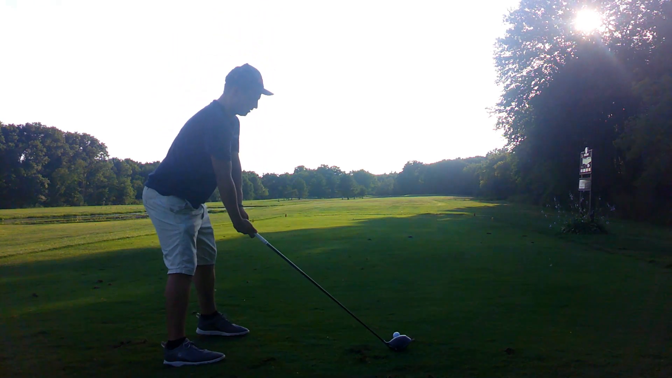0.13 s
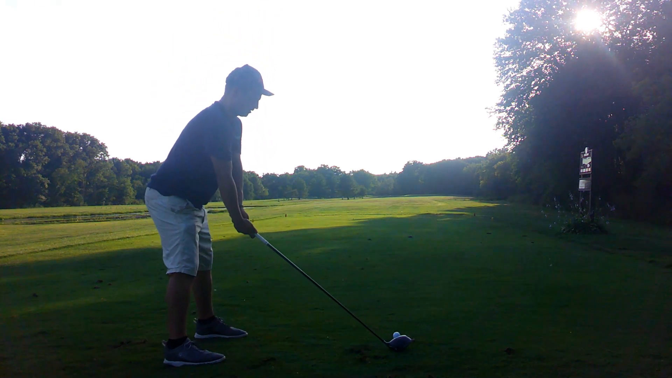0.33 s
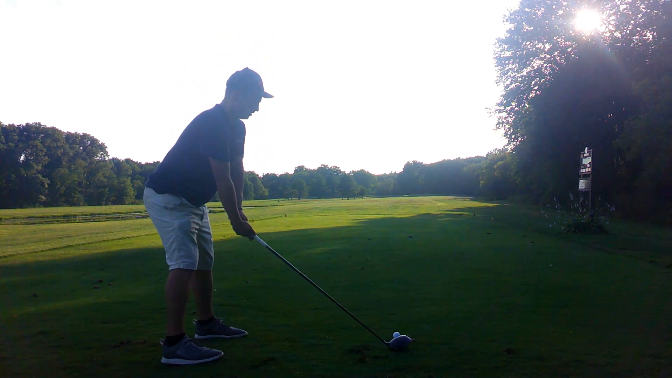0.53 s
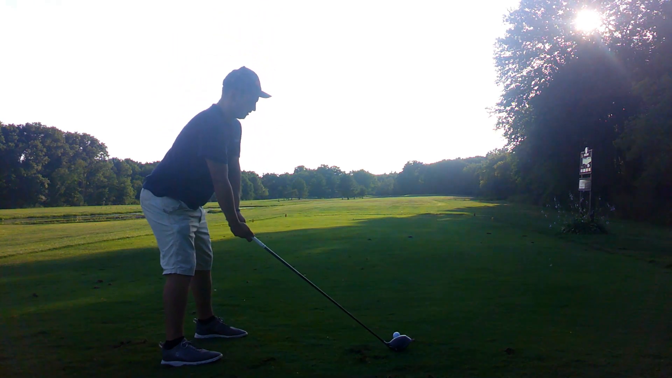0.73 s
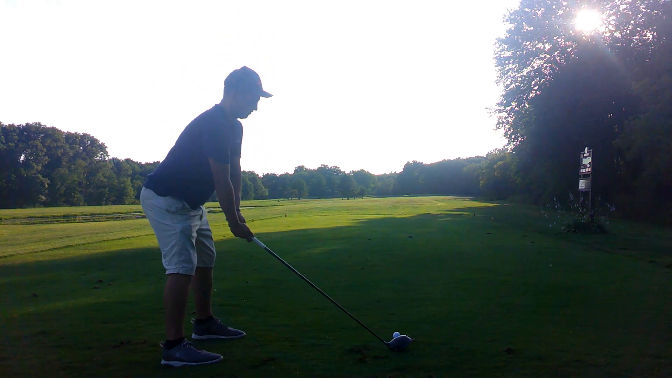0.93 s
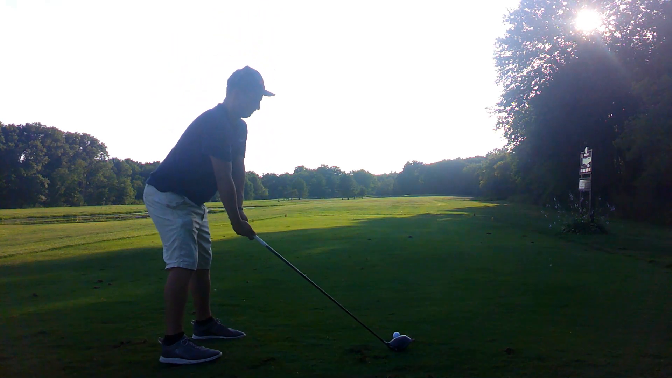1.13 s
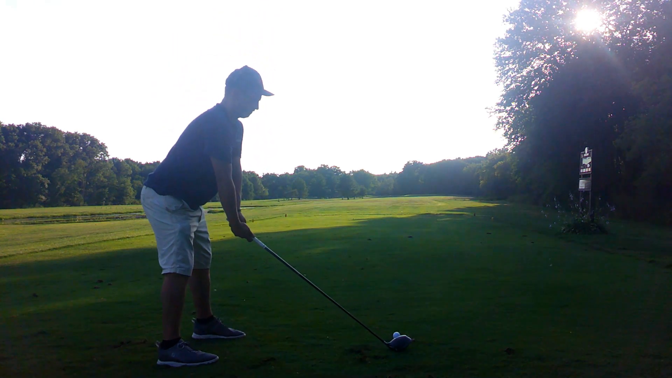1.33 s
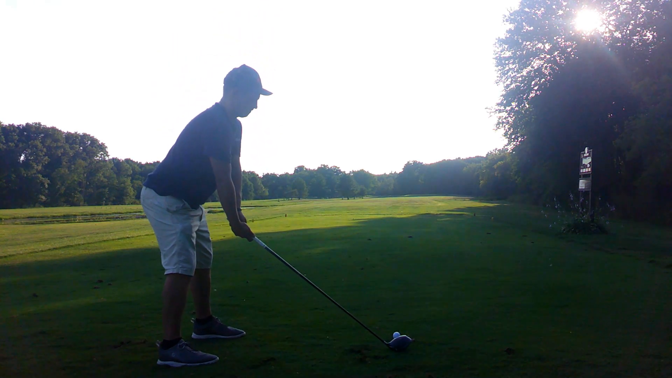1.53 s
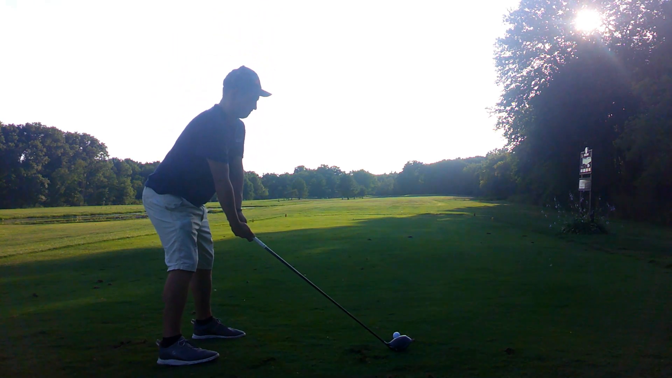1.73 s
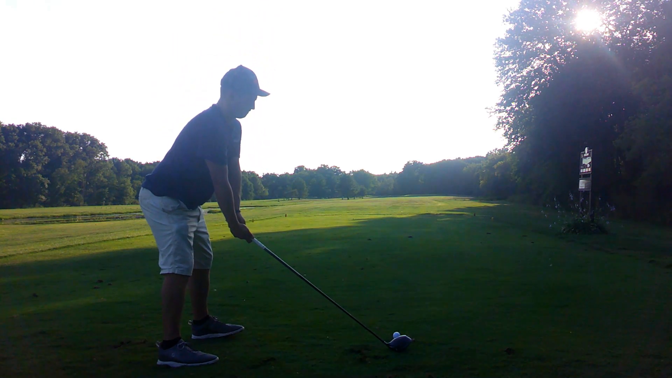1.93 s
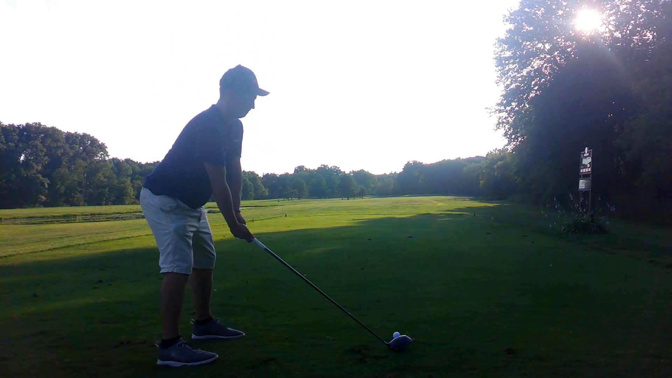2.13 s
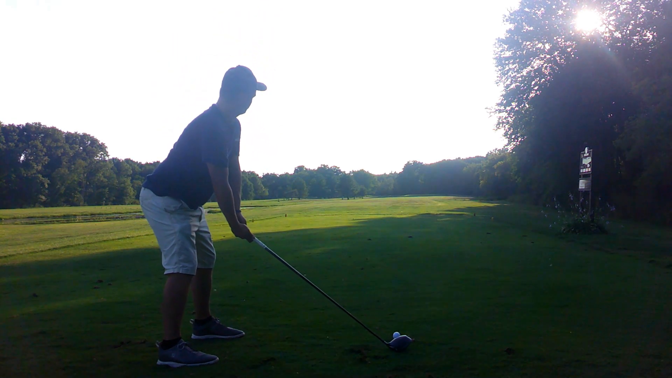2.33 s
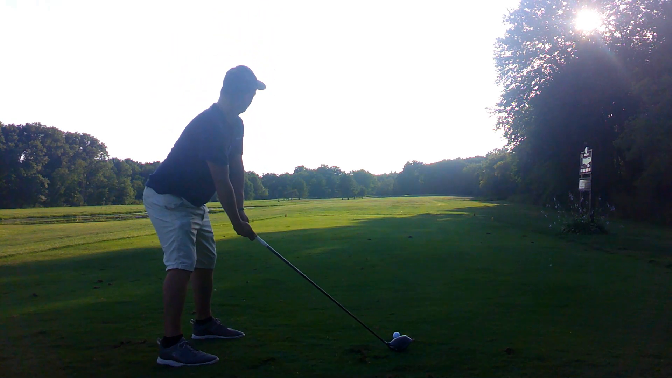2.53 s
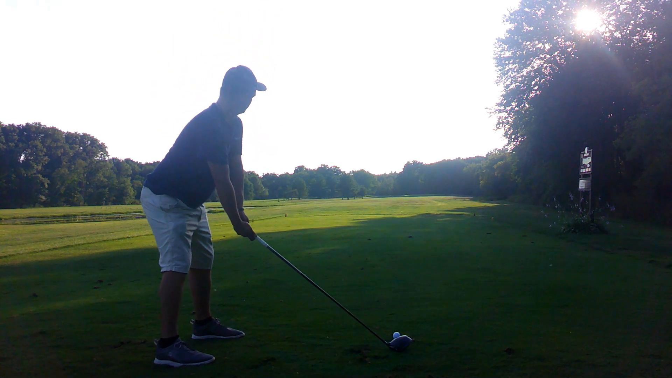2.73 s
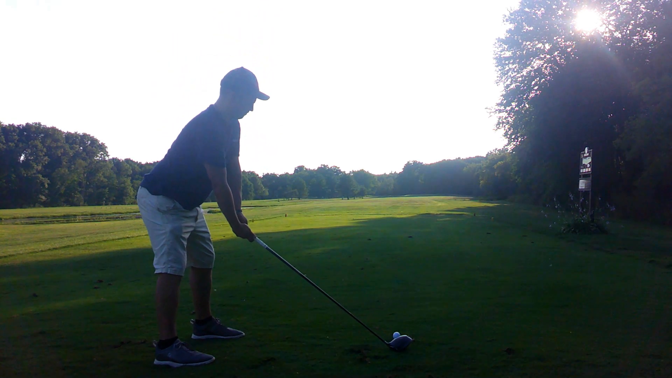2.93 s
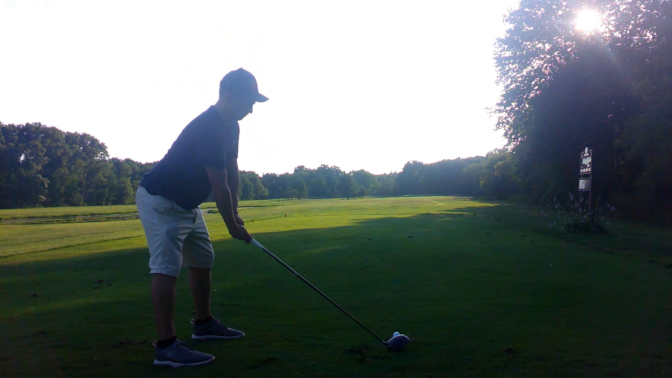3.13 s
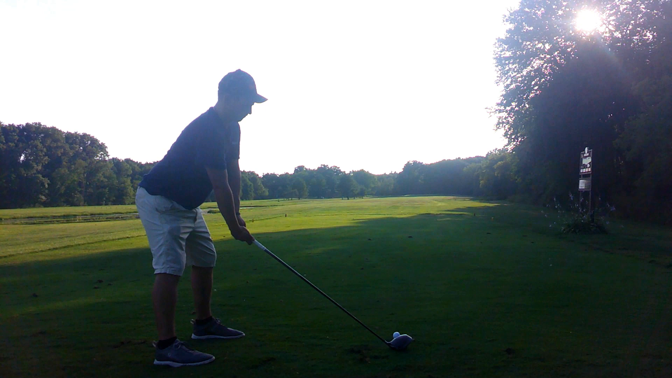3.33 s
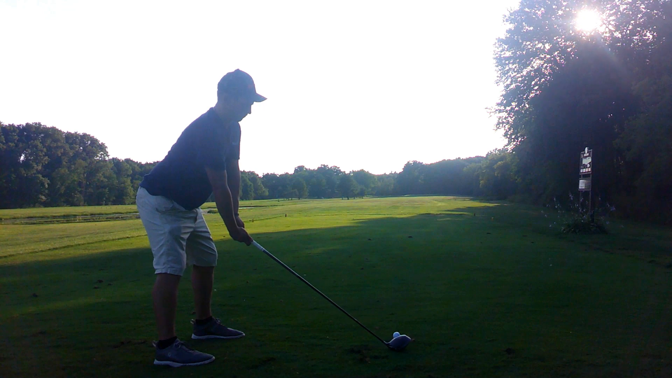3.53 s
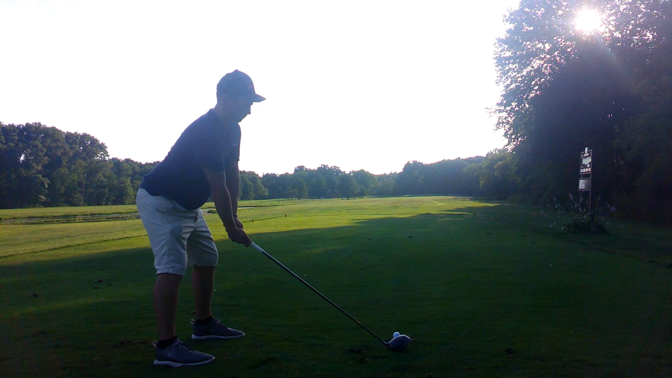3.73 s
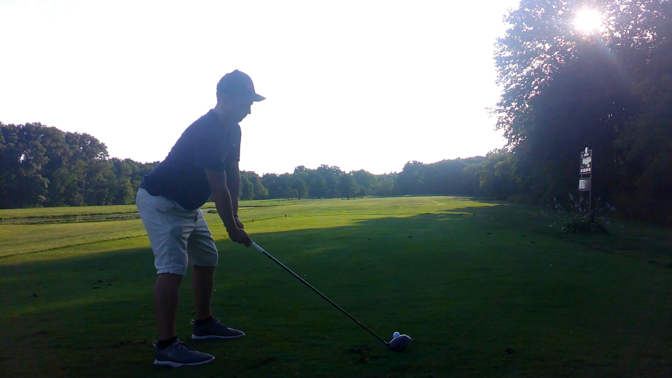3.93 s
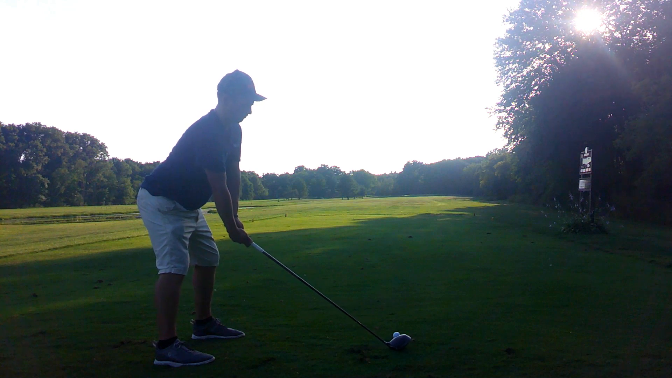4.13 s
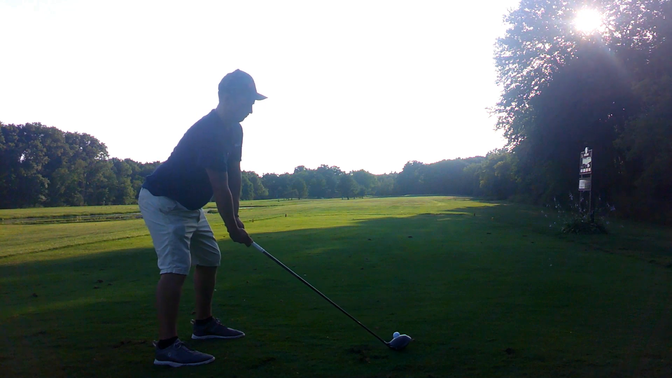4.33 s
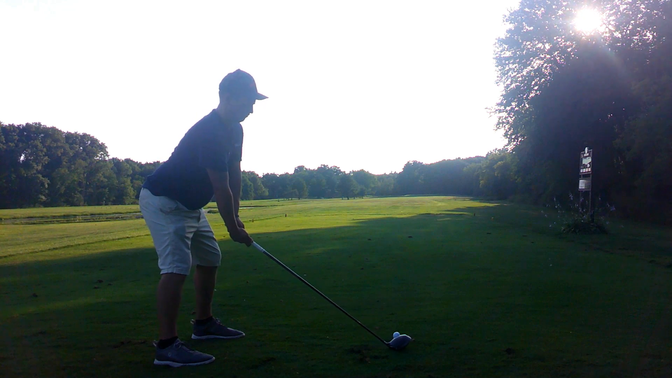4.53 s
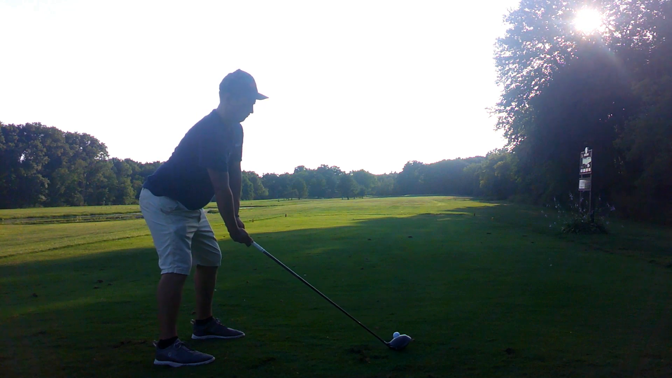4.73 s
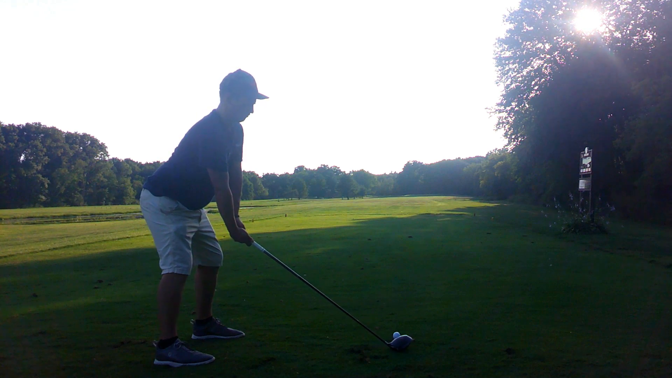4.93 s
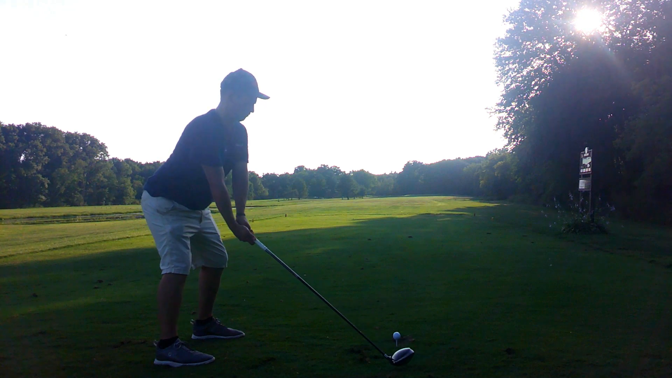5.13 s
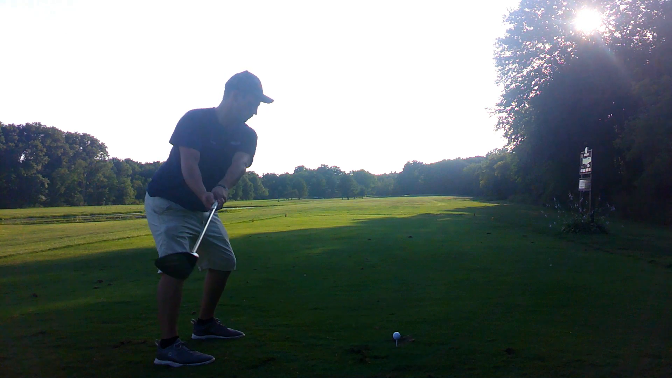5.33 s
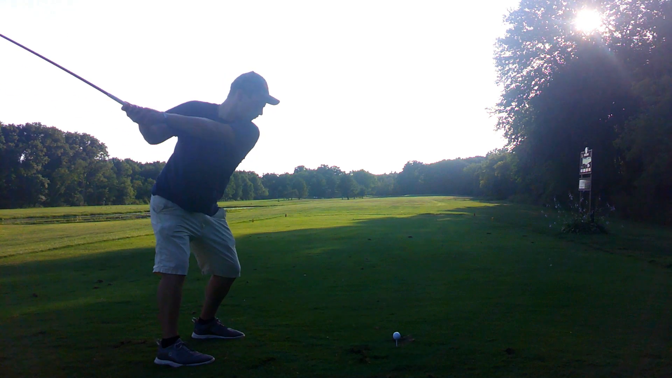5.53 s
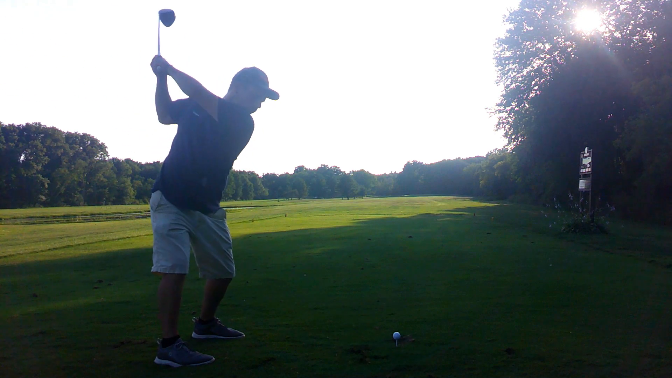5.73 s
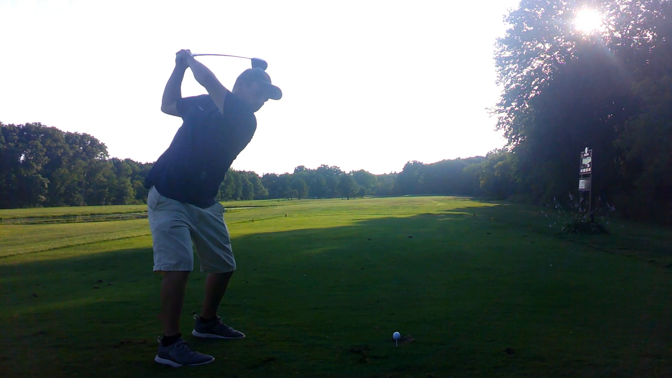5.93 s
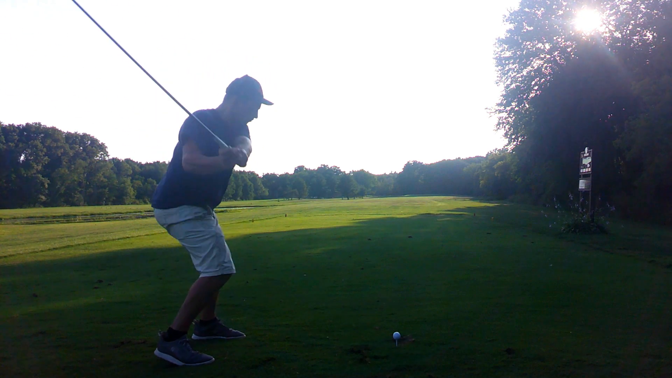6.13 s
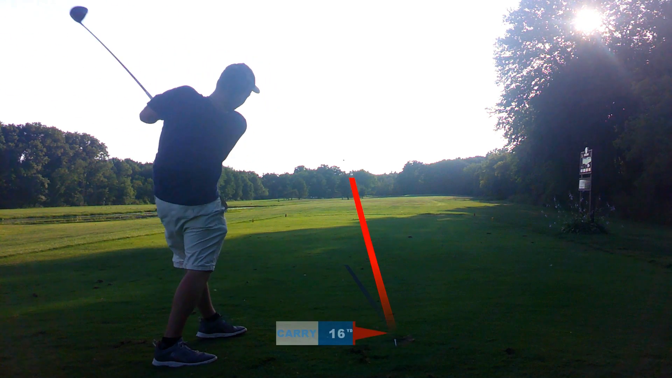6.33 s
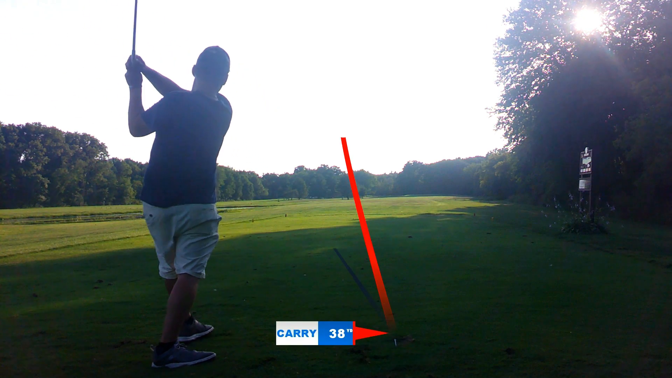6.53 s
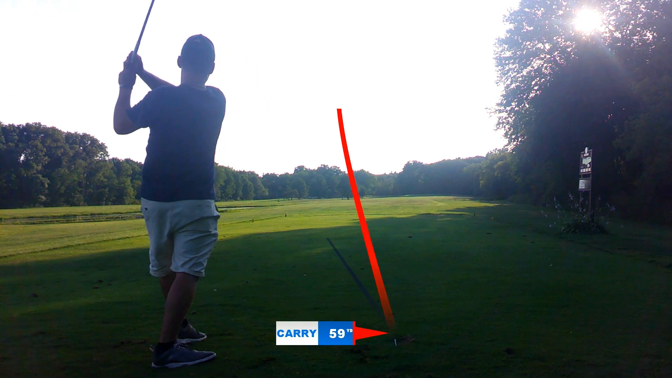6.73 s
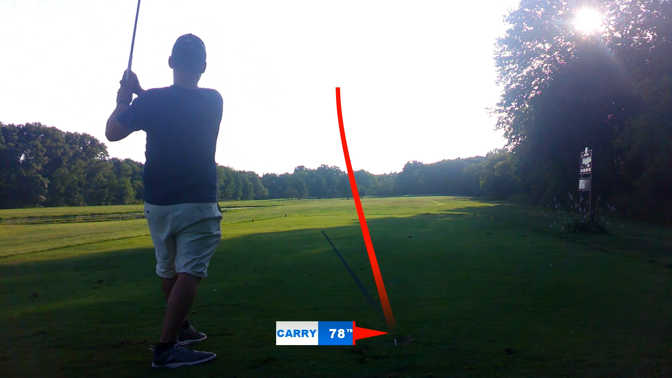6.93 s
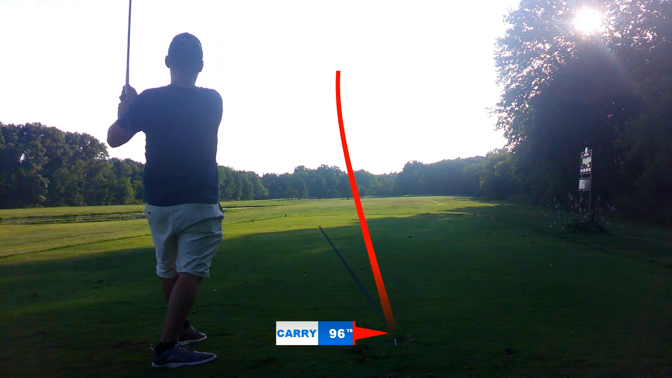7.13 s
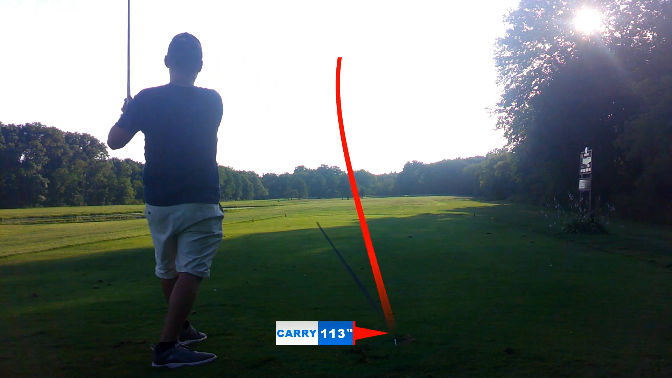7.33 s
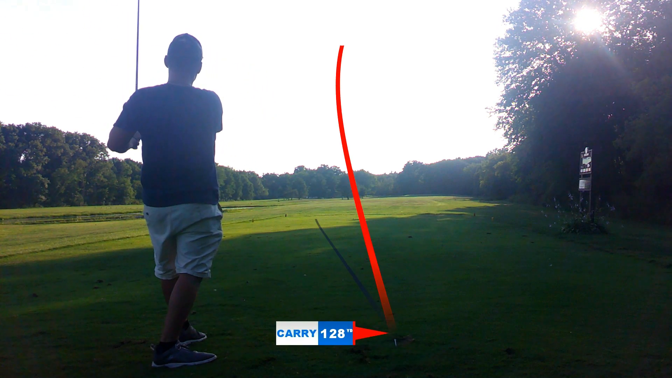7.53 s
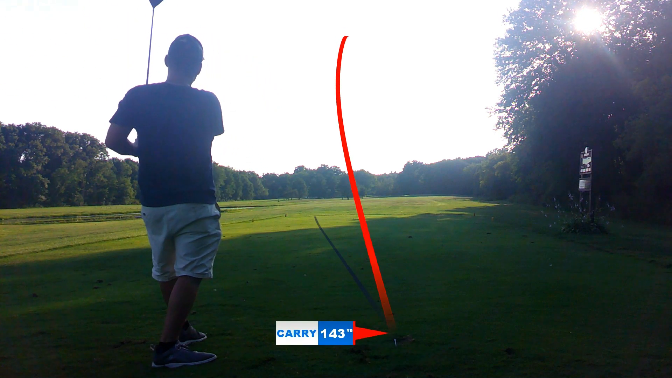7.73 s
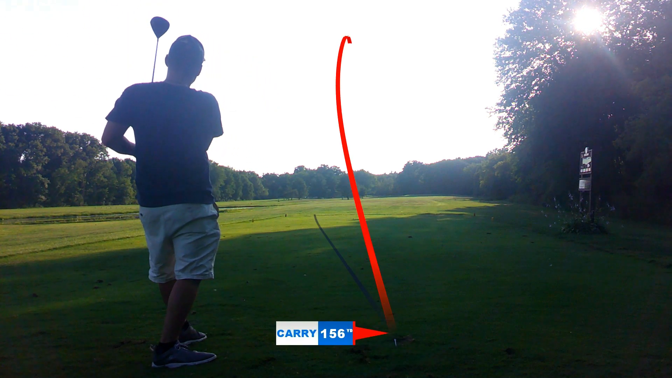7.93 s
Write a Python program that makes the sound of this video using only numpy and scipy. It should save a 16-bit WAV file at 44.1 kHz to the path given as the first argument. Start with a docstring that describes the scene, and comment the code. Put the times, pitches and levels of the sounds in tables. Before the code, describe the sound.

A golf club whooshes and hits a ball with one loud metallic crack, over passing road traffic and a faint insect hiss.

```python
"""A golf drive: the shaft whooshes through the air, then the hollow metal head cracks against the
ball and rings, overloading the microphone. Nearby trees scatter the crack back, and a farther tree
line returns a faint echo. Behind it, a droning vehicle and a car pass on a road out of sight,
more traffic rushes far off, and insects hiss in the wood."""
import sys
import numpy as np
from scipy import signal
from scipy.fft import rfft, irfft, next_fast_len
from scipy.io import wavfile
from scipy.ndimage import uniform_filter1d, map_coordinates

SR = 44100
rng = np.random.default_rng(int(sys.argv[2]) if len(sys.argv) > 2 else 0)


def generate_wav(signal):
    """Clip the signal to [-1, 1] and save it as 16-bit WAV at the path in sys.argv[1]."""
    frames = np.transpose(np.atleast_2d(signal))
    scaled = np.clip(frames, -1, 1) * 32767
    pcm = np.round(scaled).astype(np.int16)
    wavfile.write(sys.argv[1], SR, pcm)


N = 356372
T = np.arange(N) / SR
IMPACT_S = 6.172   # the club meets the ball
SOUND_M_PER_S = 343


def from_db(db):
    """Turn decibels into a number to multiply by."""
    return 10 ** (np.asarray(db) / 20)


def rms_one(x):
    """Scale a signal so its average strength (rms) is 1."""
    return x / np.sqrt(np.mean(x ** 2) + 1e-20)


def noise(colour):
    """Noise of strength 1; the colour table says how strong each pitch is next to the others."""
    hz, db = np.transpose(colour)
    size = next_fast_len(N)
    bins = np.maximum(np.fft.rfftfreq(size, 1 / SR), 1)
    gain = from_db(np.interp(np.log(bins), np.log(hz), db)) * np.minimum(bins / hz[0], 1) ** 2
    return rms_one(irfft(rfft(rng.standard_normal(size)) * gain, size)[:N])


def drift(rate):
    """A smooth random wobble of strength 1 that changes about rate times a second."""
    knots = rng.standard_normal(4096)
    return rms_one(map_coordinates(knots, [T * rate], order=2, mode="wrap"))


def swell(at_s, half_s):
    """A bell-shaped rise and fall of height 1."""
    return np.exp(-.5 * ((T - at_s) / half_s) ** 2)


def filtered(x, hz, kind):
    """Gently keep what is below hz ("low") or above it ("high")."""
    return signal.sosfilt(signal.butter(2, min(hz, SR / 3), kind, fs=SR, output="sos"), x)


def scatter(x, envelope):
    """Smear a sound into countless tiny echoes; the envelope says how late they come."""
    paths = rng.standard_normal(SR) * envelope[:SR]
    return signal.fftconvolve(x, paths / np.linalg.norm(paths))[:N]


def drive_by(closest_s, distance_m, m_per_s):
    """A straight pass: range in metres, and heading from -1 (coming) to 1 (going)."""
    along_m = m_per_s * (T - closest_s)
    range_m = np.hypot(distance_m, along_m)
    return range_m, along_m / range_m


def burst(colour, hold_s, fade_s):
    """Noise that starts with the blow, holds, then drops 60 dB every fade_s."""
    age = np.maximum(T - IMPACT_S, 0)
    return (age > 0) * from_db(-60 * np.maximum(age - hold_s, 0) / fade_s) * noise(colour)


# The insects' hiss: pitch_hz, level_db
INSECT_COLOUR = [(3500, -10), (5000, -15.5), (5350, -3.5), (5650, 2), (6100, -6.5), (6700, -7), (7500, -7),
                 (8500, -23)]
def insects(level_db=-56):
    """Insects in the wood make a steady high hiss."""
    return from_db(level_db) * noise(INSECT_COLOUR)


# The rush of distant traffic: pitch_hz, level_db
FAR_COLOUR = [(100, -16), (420, -13), (650, -9), (900, -3.5), (1200, -0.5), (1650, 1), (2100, -3),
              (2700, -10), (3500, -21.5), (4800, -34), (8000, -64.5)]
# One row for each distant car: loudest_s, half_length_s, level_db
FAR_PASSES = [(0.301, 1.34, -25), (3.199, 1.4, -29), (4.6, 0.39, -29.5), (5.418, .25, -27),
              (7.03, 0.84, -27)]
def far_traffic(flutter_db=0.51):
    """Distant cars swell and fade, blending into one rush."""
    power = sum(from_db(db) ** 2 / (1 + ((T - s) / half) ** 2) for s, half, db in FAR_PASSES)
    return np.sqrt(power) * from_db(flutter_db * drift(16)) * noise(FAR_COLOUR)


# Tyres rolling on the road: pitch_hz, level_db
ROAR_COLOUR = [(150, -18), (290, -4.5), (400, -11.5), (520, -8.5), (720, -3), (1000, -1), (1300, -3),
               (1900, -7.5), (2800, -15.5), (4000, -24.5), (5000, -34), (6200, -37), (8000, -65)]
# Gaps in the trees lift the roar, thickets dip it: middle_s, half_length_s, gain_db, treble_db
GAPS_AND_THICKETS = [(1.12, 0.42, 0.9, 2.5), (2.44, 0.23, 2, 1.5), (2.86, 0.091, -1, -.5),
                     (3.448, 0.38, 1.84, 0.3)]
def tyre_roar(level_db=-22, closest_m=46.3, wood_fade_m=62, rear_treble_db=3, flutter_db=0.6):
    """A car's tyres roar through the trees, brighter in the gaps and once it has gone by."""
    range_m, heading = drive_by(closest_s=2.15, distance_m=closest_m, m_per_s=24)
    gap_db, gap_treble_db = sum(np.outer([db, treble_db], swell(s, half))
                                for s, half, db, treble_db in GAPS_AND_THICKETS)
    # distance weakens the roar, and so do the trees in the way
    carried = closest_m / range_m * np.exp((closest_m - range_m) / wood_fade_m)
    roar = noise(ROAR_COLOUR)
    treble = roar - uniform_filter1d(roar, size=13)
    roar += (from_db(rear_treble_db * heading + gap_treble_db) - 1) * treble
    return from_db(level_db + gap_db + flutter_db * drift(14)) * carried * roar


def next_car(end_db=-30.5, rise_db_per_s=9.5):
    """A dull tyre roar grows at the end as another car nears."""
    return from_db(end_db + rise_db_per_s * (T - T[-1])) * filtered(noise(ROAR_COLOUR), 900, "low")


# Stretches of road where the tyres sing: middle_s, half_length_s, pitch_hz, level_db
TREAD_NOTES = [(1.95, .2, 1179, -34), (2.57, .14, 1040, -26), (3.7, 0.4, 940, -29.5),
               (4.699, .25, 929, -33), (5.451, 0.24, 902, -39.5)]
def tread_song(half_width_hz=75):
    """Air pumped from the tyre grooves makes a breathy note that slides lower with each swell."""
    times, _, pitches, _ = np.transpose(TREAD_NOTES)
    hz = np.interp(T, times, pitches)
    level = sum(from_db(db) * swell(s, half) for s, half, _, db in TREAD_NOTES)
    slow = filtered(rng.standard_normal((2, N)), half_width_hz, "low")
    # shift the slow noise up to the note's pitch
    note = np.real((slow[0] + 1j * slow[1]) * np.exp(2j * np.pi * np.cumsum(hz) / SR))
    return level * rms_one(note)


# Rumble of the exhaust and body: pitch_hz, level_db
RUMBLE_COLOUR = [(30, -34), (55, -23), (75, -10.5), (105, -3.5), (150, 2), (215, -1), (260, -8), (330, -18),
                 (480, -23.5), (900, -68)]
# Exhaust tones, at multiples of the engine's cycle: multiple, coming_db, nearly_level_db, going_db
EXHAUST_TONES = [(2, -8, -8.5, -13), (3, -1.5, -0.5, -7.5), (4, -10, -6, -12), (5, -15, -14, -8.5),
                 (6, -20.5, -13, -24.5), (7, -21.5, -16, -20), (8, -27, -18.5, -27), (9, -24, -22, -32.5),
                 (10, -23, -23, -33.5)]
def engine(level_db=-24, cycle_hz=42.8, closest_m=22, m_per_s=18.5, tailpipe_db=1.4, waver_db=1.45):
    """An exhaust drones over a rumble; going by, it drops in pitch (Doppler) and changes colour."""
    range_m, heading = drive_by(closest_s=1.4, distance_m=closest_m, m_per_s=m_per_s)
    hz = cycle_hz / (1 + heading * m_per_s / SOUND_M_PER_S)
    phase = 2 * np.pi * np.cumsum(hz) / SR
    pipe_facing_us = np.maximum(heading, 0) ** 4
    rumble_db = -4.5 + 2.5 * heading + tailpipe_db * pipe_facing_us
    drone = from_db(rumble_db) * noise(RUMBLE_COLOUR)
    for multiple, *levels_db in EXHAUST_TONES:
        tone_db = np.interp(heading * abs(heading), [-3 / 5, -1 / 12, 1], levels_db)
        # the trip through the air makes each tone fade and wander on its own
        gain = np.sqrt(2) * from_db(tone_db + waver_db * drift(7))
        drone += gain * np.sin(multiple * phase + rng.uniform(0, 2 * np.pi) + 0.28 * drift(5))
    return from_db(level_db) * closest_m / range_m * drone


# Groups of trees: delay_s, spread_s, level_db, lowest_hz, direction (1 behind, 0 beside, -1 ahead)
TREE_GROUPS = [(.025, 0.013, -25, 2500, 0.7), (.06, 0.011, -25, 2500, 0.85),
               (.088, 0.017, -21.5, 2500, 0.91), (.148, 0.028, -32.5, 2000, -.1),
               (.2, 0.039, -38.5, 2490, 0.7), (.298, .022, -34, 6020, .75), (.3, 0.076, -42.5, 4000, -.3)]
def tree_echoes(noises, ring, group_width=.2, leaf_cut_hz=6600, low_echo_db=-19.5):
    """Trees return smeared, mostly high copies of the stroke; the whole wood returns the lows."""
    highs = np.zeros(N)
    fan = group_width * np.array([-1, 0, 1])
    for delay, spread, db, lowest_hz, direction in TREE_GROUPS:
        for towards in np.clip(direction + fan, -1, 1):
            sent = filtered(noises + follow_through(ring, towards), lowest_hz, "high")
            highs += from_db(db) / np.sqrt(len(fan)) * scatter(sent, swell(delay, spread))
    lows = scatter(filtered(noises, 900, "low"), swell(at_s=0.097, half_s=0.051))
    return filtered(highs, leaf_cut_hz, "low") + from_db(low_echo_db) * lows


# Air swirling off the shaft and head: pitch_hz, level_db
WHOOSH_COLOUR = [(90, -20.5), (200, -5), (300, -1.5), (430, -9), (590, -1.5), (780, -2.5), (920, -2),
                 (1100, -11), (2000, -23), (4000, -50)]
# Air hissing over the head's edges: pitch_hz, level_db
EDGE_COLOUR = [(1500, -7), (3200, 4.5), (4800, -7), (6400, 0), (7400, -11), (8600, -19)]
# The whoosh peaks before the ball and past it: peak_s, level_db, rise_db_per_s, fall_db_per_s
WHOOSH_PEAKS = [(6.126, -12.5, 520, 199), (6.191, -13, 210, 1004)]
def swing(shaft_hz=797, pitch_sag=.05, rush_db=-3.5, tone_db=-7.0, edge_db=-34):
    """Swirls of air make a brief tone at the shaft, and a broad whoosh and hiss at the head."""
    peaks_db = [db - np.maximum(rise * (s - T), fall * (T - s)) for s, db, rise, fall in WHOOSH_PEAKS]
    strength = from_db(np.maximum(np.max(peaks_db, axis=0), -150))
    hz = shaft_hz * (strength / strength.max()) ** pitch_sag   # highest when the shaft is fastest
    tone = np.sqrt(2) * np.sin(2 * np.pi * np.cumsum(hz) / SR + 0.54 * drift(150))
    air = from_db(rush_db) * noise(WHOOSH_COLOUR) + from_db(tone_db) * tone
    hiss = from_db(edge_db) * swell(at_s=6.158, half_s=0.037) * noise(EDGE_COLOUR)
    return strength * air + hiss


def follow_through(ring, direction, head_m_per_s=32.2, radius_m=1.6):
    """The ringing head flies on along its arc, so its pitch glides, differently in each direction."""
    sounding = (T > IMPACT_S) & (T < IMPACT_S + len(ring) / SR)
    age = T[sounding] - IMPACT_S
    forward_m = radius_m * np.sin(head_m_per_s * age / radius_m)
    # Doppler shift, set so the pitch is unchanged behind the golfer at the blow
    ring_time = age + (head_m_per_s * age - direction * forward_m) / SOUND_M_PER_S
    heard = np.zeros(N)
    heard[sounding] = map_coordinates(ring, [ring_time * SR], order=3)
    return heard


# The head's main tones, heard from behind at the blow: pitch_hz, level_db, fade_s (to drop 60 dB)
HEAD_TONES = [(760, -13, .06), (990, -13, .06), (2632, -8.5, .065), (2767, -17, .05), (3368, -7, .16),
              (3515, -8.5, .19), (3630, -14, .12), (4370, -23, .24), (4770, -19, .2), (4900, -24, .24),
              (5290, -18, .09), (5420, -11, .24), (5775, -12, .08), (5950, -17, .09), (6175, 0, .07),
              (6260, -9, .12), (6870, -18, .2), (7250, -19, .06), (7450, -28, .16), (7725, -21, .09),
              (8170, -29, .11)]
# How strong the thin shell's many weaker tones are: pitch_hz, level_db
SHELL_LEVELS = [(3200, -30), (3700, -21), (4200, -35), (5000, -34), (6000, -23), (7000, -30), (8300, -36)]
def head_ring(level_db=1.0, shell_count=44, shell_fade_s=.16, turn_s=0.047, turned_fade_s=.025):
    """The struck metal head rings with its main tones amid a dense clank from its thin shell."""
    age = T[:SR // 4]
    shell_hz, shell_db = np.transpose(SHELL_LEVELS)
    places = (np.arange(shell_count) + rng.random(shell_count)) / shell_count
    pitches = shell_hz[0] + np.ptp(shell_hz) * places
    shell = [(hz, np.interp(hz, shell_hz, shell_db), shell_fade_s) for hz in pitches]
    signs = [*np.resize([1, -1], len(HEAD_TONES)), *rng.choice([-1, 1], shell_count)]
    ring = sum(sign * from_db(db - 60 * age / fade_s) * np.sin(2 * np.pi * hz * age)
               for sign, (hz, db, fade_s) in zip(signs, [*HEAD_TONES, *shell]))
    # the ring fades quickly once the club face has turned away
    return ring * from_db(level_db - 60 * np.maximum(age - turn_s, 0) / turned_fade_s)


# The click of the club face: pitch_hz, level_db
CLICK_COLOUR = [(1000, -14), (2900, -12), (3300, 12), (3900, 12), (4400, 3), (5000, -5), (6100, -1),
                (7000, -11), (8300, -15)]
def face_click(level_db=-11.5):
    """The metal face meets the ball with a very short, bright click."""
    return from_db(level_db) * burst(CLICK_COLOUR, hold_s=0.00077, fade_s=0.0096)


# The crack of the blow: pitch_hz, level_db
CRACK_COLOUR = [(30, -19), (120, -2), (270, 1.5), (600, 4.5), (1250, 0), (2000, 4), (3600, -2.5),
                (4500, -19), (6000, -4), (7400, -8), (8600, -23)]
def ball_crack(level_db=-3.5):
    """The club hits ball, tee and turf in one loud crack."""
    return from_db(level_db) * burst(CRACK_COLOUR, hold_s=0.0067, fade_s=0.058)


def scene(outward_db=25.0):
    """The stroke, heard from behind, and its echoes over insects and traffic."""
    whoosh_and_crack = swing() + ball_crack()
    click = face_click()
    ring = head_ring()
    stroke = whoosh_and_crack + click + follow_through(ring, direction=1)
    # the face throws its click outward, much louder towards the trees than backward
    echoes = tree_echoes(whoosh_and_crack + from_db(outward_db) * click, ring)
    background = insects() + engine() + tread_song() + tyre_roar() + next_car() + far_traffic()
    return (stroke + echoes + background)[None]


def record(dry):
    """The microphone flattens the loudest peaks and dulls the treble, whose top is then cut off."""
    ceiling, cutoff_hz = .78, 8250
    flattened = dry / (1 + (dry / ceiling) ** 6) ** (1 / 6)
    dulled = filtered(flattened, 11000, "low")
    return signal.sosfilt(signal.ellip(8, .1, 80, cutoff_hz, fs=SR, output="sos"), dulled)


dry = scene()
out = record(dry)
generate_wav(out)
```